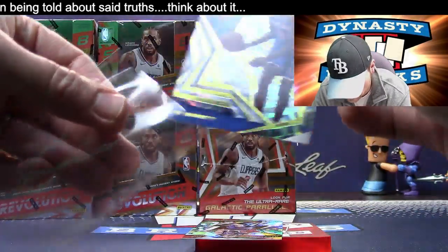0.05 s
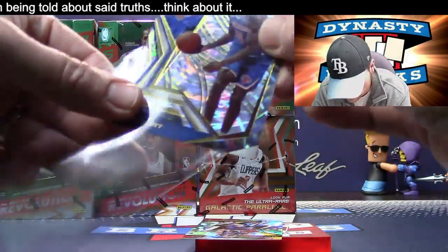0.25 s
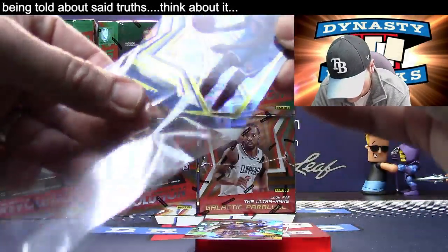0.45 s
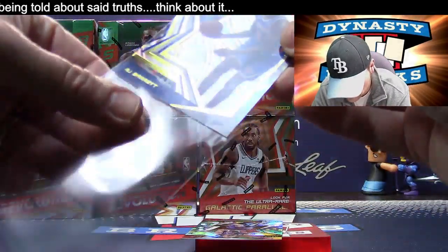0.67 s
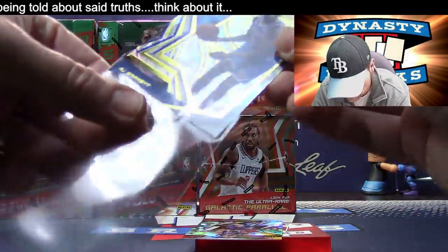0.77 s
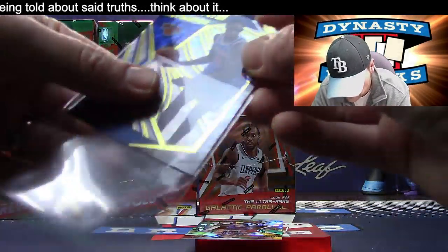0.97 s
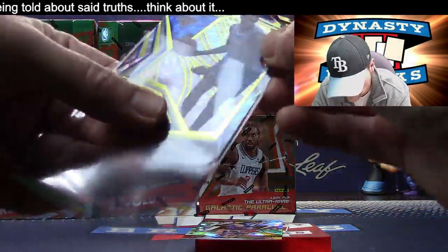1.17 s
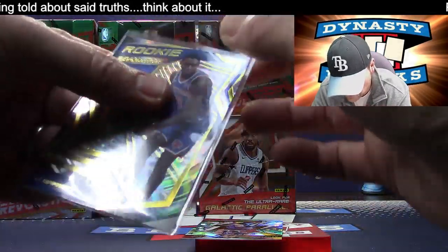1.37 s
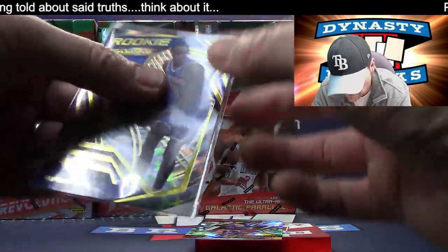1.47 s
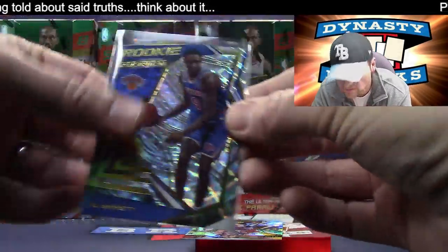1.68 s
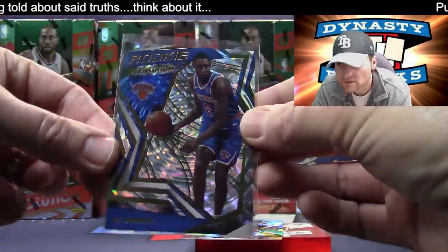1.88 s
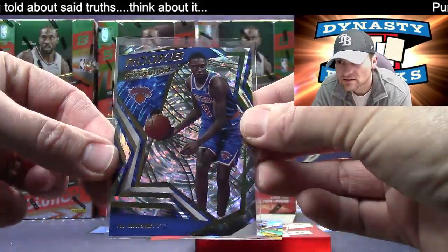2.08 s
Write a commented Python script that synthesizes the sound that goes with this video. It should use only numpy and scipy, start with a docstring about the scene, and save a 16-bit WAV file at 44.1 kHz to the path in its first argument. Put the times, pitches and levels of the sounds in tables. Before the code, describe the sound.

A trading card is pushed into a clear plastic holder, close to the microphone in a small room: a brief bright rub first, a faint tick, then a sharp snap and lighter click over low handling rumble.

```python
"""In a small room, close to the microphone, a trading card is slid into a clear plastic holder.
Plastic rubs briefly (dense random slips), the card's corner ticks against the opening (a noise burst), then
the card snaps home (noise cracks and decaying modes) and settles with a lighter click. A fingertip squeaks
faintly (a wavering tone) and soft touches sound (damped resonances). Low handling rumble, bumps, finger
friction and hiss (coloured noise and pulses) lie beneath; echoes and a diffuse tail give the room."""
import sys
import numpy as np
from scipy import signal
from scipy.fft import rfft, irfft
from scipy.io import wavfile

SR = 44100
rng = np.random.default_rng(int(sys.argv[2]) if len(sys.argv) > 2 else 0)


def store_wav(level_fs):
    """Save 16-bit WAV to argv[1]."""
    pcm = np.round(np.clip(np.atleast_2d(level_fs), -1, 1) * 32767)
    wavfile.write(sys.argv[1], SR, pcm.T.astype(np.int16))


N = 94197
T = np.arange(N) / SR  # time of each sample in seconds

# In every colour table the levels are relative: the coloured signal is scaled to rms 1.

# Catches of the card in the holder. Each row: start in seconds, ring gain in dB, crack level in dB.
CLICKS = [(1.1832, -64, -51), (1.1853, -52, -49), (1.1894, -35, -38.5), (1.1907, -34, -47)]
# Modes of the holder. Each row: frequency in Hz, level in dB before the ring gain, t60 in seconds.
HOLDER_MODES = [(5500, -17, .012), (6500, -16, .012), (7016, -6, .016), (7867, -3, .018), (8500, -15, .012),
                (11800, -21, .01)]
# Spectrum of the cracks. Each row: frequency in Hz, level in dB.
CRACK_COLOUR = [(450, -23), (700, -23.5), (900, -6.5), (1150, -8), (1350, -5), (1700, -17), (2200, -1.5),
                (2550, -14), (2850, -20.5), (3450, -33), (3750, -8.5), (5000, -14.5), (6800, 10),
                (8000, 6.5), (9200, 5.5), (10500, -3.5), (11700, 1.5), (13500, -18.5), (14800, -6.5),
                (15800, -17)]
CRACK_T60_S = .015
# The card gathers speed before it seats. Each row: time in seconds, level in dB.
PUSH_LEVEL = [(1.10, -115), (1.145, -87.5), (1.168, -86), (1.18, -62), (1.186, -42), (1.192, -110)]
# Spectrum of that slide. Each row: frequency in Hz, level in dB.
PUSH_COLOUR = [(600, -21), (1000, -1), (2200, -10), (3200, -24), (4000, -8.5), (5000, -14), (7500, -4),
               (11000, -0.5), (15500, -17)]
# The card's edge flaps back against the wall. Each row: peak time in seconds, level in dB.
FLAPS = [(1.2668, -52), (1.2685, -52)]
# Spectrum of the flaps. Each row: frequency in Hz, level in dB.
FLAP_COLOUR = [(700, -22), (1250, -11), (1570, -19), (1950, -11.5), (2800, -25.5), (3700, 1), (4500, 0.5),
               (5100, -9.5), (5700, -0.5), (6500, -2), (8200, 2.5), (8900, 0), (9500, -20), (11000, -9),
               (11500, 0.5), (12400, -27), (15000, -22)]
# The card's edge rings on. Each row: frequency in Hz, level in dB, t60 in seconds.
FLAP_RING = [(8160, -56, 0.057)]
FLAP_RISE_S, FLAP_T60_S = .0009, .022
HOLLOW_HZ, HOLLOW_WIDTH_HZ = 3060, 610  # the holder radiates poorly here

# Pressure of the opening rub. Each row: time in seconds, level in dB.
RUB_LEVEL = [(0, -57), (.016, -49), (.038, -50), (.055, -48), (.072, -50.5), (.087, -52.5), (.096, -74.5),
             (.13, -120)]
# Spectrum of the rub's slips. Each row: frequency in Hz, level in dB.
RUB_COLOUR = [(410, -67), (700, -52), (1100, -51), (1250, -22.5), (1470, -25.5), (1580, -17.5),
              (1690, -11.5), (2080, -16), (2160, -9), (4080, -5.5), (5150, -6), (6760, 3), (9980, -1.5),
              (13400, -12), (15500, -34)]
# Resonances of the rubbed sheet. Each row: frequency in Hz, width in Hz, initial level in dB.
RUB_RESONANCES = [(1905, 100, -15.5), (3215, 97, -19.5), (4280, 280, -21.5), (7550, 390, -9.5),
                  (10000, 190, -16)]
RUB_RING_LOSS_DB_PER_S = 89.5  # the sheet rings less as the card fills it
RUB_GRAINS_PER_S, RUB_GRAIN_SPREAD_DB = 25000, 2.2
RUB_BRIGHT_HZ, RUB_BRIGHT_DB, RUB_DULLING_DB_PER_S = 5490, -3, 60  # the treble fades as the rub slows
RUB_PATCHY_DB, RUB_PATCH_HZ = 2.5, 35
# The sheet drags harder once. Each row of its spectrum: frequency in Hz, level in dB.
RUB_DRAG_COLOUR = [(1100, -39.5), (1700, -9), (2600, -3), (3900, -2), (5500, -3), (8000, -17.5),
                   (10300, -6.5), (14000, -25.5)]
RUB_DRAG_S, RUB_DRAG_DB, RUB_DRAG_RISE_S, RUB_DRAG_T60_S = .054, -53.5, .0031, .11

# Scuff of the card's corner on the opening. Each row: frequency in Hz, level in dB.
TICK_COLOUR = [(900, -36), (1900, -25), (2280, 7.5), (2900, -17.5), (3850, -11), (4700, -18), (6000, -25),
               (6950, -5.5), (8000, -31.5), (12700, -15), (15000, -28)]
TICK_S, TICK_DB, TICK_RISE_S, TICK_T60_S = .3665, -68, .0031, .024

# Light touches on the plastic. Each row: peak time in seconds, level in dB, frequency in Hz, width in Hz,
# rise in seconds, t60 in seconds.
TOUCHES = [(.05, -86.5, 386, 59.5, 0.022, 0.16), (.15, -84, 400, 73.7, 0.013, 0.29),
           (.15, -96, 530, 90, 0.011, .1), (0.334, -87, 550, 78.4, .008, 0.047),
           (0.383, -84.5, 455, 47.5, .012, 0.11), (0.417, -82, 291, 71, 0.01, 0.075),
           (.538, -90, 507, 90.4, 0.007, .06), (.65, -82.5, 346, 41, 0.013, .12),
           (0.74, -90.5, 642, 102.5, 0.0046, 0.08), (.802, -92.5, 712, 61.6, 0.018, 0.11),
           (0.977, -79.5, 953, 170, 0.0083, 0.045), (1.021, -83, 342, 69, 0.0069, 0.094),
           (1.395, -83.5, 478, 79, 0.0087, 0.087), (1.468, -84.5, 757, 90.4, 0.0054, 0.12),
           (1.586, -84.5, 780, 71.4, .01, 0.11), (1.732, -67.5, 1400, 294.8, 0.0019, 0.076),
           (1.736, -93, 3260, 120, 0.0035, 0.036), (1.736, -73.5, 556.3, 98, 0.0087, .17),
           (1.946, -77.5, 560, 79.6, 0.0029, 0.075), (2.015, -81, 590, 79.2, 0.01, 0.094),
           (2.068, -86.5, 634, 79, .008, 0.082)]

# Fingertip sticking and slipping. Each row: time in seconds, pitch in Hz, level in dB.
SQUEAK = [(1.652, 1239, -100), (1.672, 1257, -67.5), (1.688, 1289, -69), (1.70, 1300, -95),
          (1.715, 1324, -75.5), (1.745, 1390, -77), (1.78, 1488, -85.5), (1.805, 1580, -100)]
SQUEAK_JITTER, SQUEAK_FLUTTER_DB = .014, -.5  # scale of the random wander: fraction of pitch, level

# Soft bumps of the hands. Each row: centre in seconds, peak level in dB, length in seconds.
BUMPS = [(.141, -46, 0.014), (0.259, -41, .0066), (0.412, -45.5, 0.009), (0.451, -50.5, 0.0071),
         (0.538, -50.5, 0.0069), (0.596, -44, 0.018), (0.689, -52, 0.013), (.735, -52, 0.007),
         (0.8, -42.5, 0.012), (.858, -56, 0.0061), (0.926, -48.5, 0.0099), (1.019, -54, 0.0066),
         (1.057, -52.5, 0.013), (1.419, -37.5, 0.0072), (1.765, -37.5, .0061), (1.937, -40.5, 0.0051),
         (2.089, -34.5, 0.0073)]

# Level of the handling rumble. Each row: time in seconds, level in dB.
RUMBLE_LEVEL = [(0, -42), (.06, -42), (.11, -46), (.26, -46.5), (.35, -50), (.43, -52), (.6, -55.5),
                (.68, -62), (.8, -46.5), (.89, -60.5), (1.0, -60.5), (1.09, -60.5), (1.2, -39.5),
                (1.35, -46.5), (1.5, -37), (1.65, -43), (1.85, -42.5), (2.11, -42)]
# Spectrum of the rumble. Each row: frequency in Hz, level in dB.
RUMBLE_COLOUR = [(12, 13), (17, 12), (27, -1), (45, -7.5), (68, -6), (95, -17.5), (120, -13.5), (160, -26),
                 (220, -36), (300, -46)]
# Level of the soft finger friction. Each row: time in seconds, level in dB.
FINGER_LEVEL = [(.02, -96.5), (.16, -92), (.32, -98.5), (.4, -88), (.5, -95.5), (.66, -96.5), (.9, -95.5),
                (1.03, -93), (1.12, -95.5), (1.3, -92.5), (1.48, -85), (1.65, -86.5), (1.85, -86.5),
                (2.1, -90.5)]
# Spectrum of the finger friction. Each row: frequency in Hz, level in dB.
FINGER_COLOUR = [(120, -8), (280, 2.5), (500, -5.5), (800, -14.5), (1400, -19.5), (3000, -33),
                 (8000, -40.5)]
FINGER_LUMPS_DB, FINGER_LUMPS_HZ = 2.5, 14
# Spectrum of the hiss. Each row: frequency in Hz, level in dB.
HISS_COLOUR = [(200, 12.5), (1000, -14), (3000, -1.5), (8000, -1.5), (15000, 1)]
HISS_DB = -98
RUMBLE_SIDE_DB, FINGER_SIDE_DB, HISS_SIDE_DB = -25, -15, -1.5  # side relative to centre

# Early reflections from nearby surfaces. Each row: delay in seconds, level in dB.
ECHOES = [(.0046, -20), (.0092, -16)]
# Spectrum of the diffuse tail. Each row: frequency in Hz, level in dB.
ROOM_COLOUR = [(300, -3), (1200, 3.5), (2200, 3), (4000, 4), (8000, .5), (12000, -.5), (16000, 3)]
# Further colouring of the tail's side signal. Each row: frequency in Hz, level in dB.
ROOM_SIDE_COLOUR = [(300, -7.5), (1000, -11.5), (2500, -10), (6000, -10), (10000, -19.5), (13000, -6)]
ROOM_DB, ROOM_SIDE_DB, ROOM_DELAY_S, ROOM_BUILD_S = -8.5, -7.5, .005, .0013
ROOM_T60_S, TREBLE_T60_S, WALL_DAMPING_HZ = .33, .225, 1638  # the treble decays faster above this split
CUTOFF_HZ = 15800


def card_seating():
    """Impact excitation: a slide ends in catches that crack and ring the holder; then the edge flaps back."""
    slide = from_db(in_time(PUSH_LEVEL)[0]) * friction(PUSH_COLOUR)
    rings = sum(from_db(ring_db) * ring(s, HOLDER_MODES) for s, ring_db, _ in CLICKS)
    crack_level = sum(from_db(crack_db) * decay(s, CRACK_T60_S) for s, _, crack_db in CLICKS)
    cracks = crack_level * noise(CRACK_COLOUR)
    flap_level = sum(from_db(db) * swell(s, FLAP_RISE_S, FLAP_T60_S) for s, db in FLAPS)
    flaps = flap_level * noise(FLAP_COLOUR) + ring(FLAPS[-1][0], FLAP_RING)
    hollow = signal.iirnotch(HOLLOW_HZ, HOLLOW_HZ / HOLLOW_WIDTH_HZ, fs=SR)
    return signal.lfilter(*hollow, slide + rings + cracks + flaps)


def rub():
    """Friction excitation: slips drive the sheet's resonances in turn, and the swish dulls as it slows."""
    slips = patchy(friction(RUB_COLOUR), RUB_PATCHY_DB, RUB_PATCH_HZ)
    for hz, width_hz, db in RUB_RESONANCES:
        resonance = rms_one(signal.lfilter(*signal.iirpeak(hz, hz / width_hz, fs=SR), slips))
        slips = slips + from_db(db - RUB_RING_LOSS_DB_PER_S * T) * resonance
    low = lowpass(slips, RUB_BRIGHT_HZ)
    treble = (slips - low) * from_db(RUB_BRIGHT_DB - RUB_DULLING_DB_PER_S * T)
    swish = from_db(in_time(RUB_LEVEL)[0]) * (low + treble)
    drag_level = from_db(RUB_DRAG_DB) * swell(RUB_DRAG_S, RUB_DRAG_RISE_S, RUB_DRAG_T60_S)
    return swish + drag_level * friction(RUB_DRAG_COLOUR)


def corner_tick():
    """Transient scuffing: a short burst of coloured noise under a soft attack and exponential release."""
    return from_db(TICK_DB) * swell(TICK_S, TICK_RISE_S, TICK_T60_S) * noise(TICK_COLOUR)


def touches():
    """Damped resonance: each soft contact is one decaying tone, broadened by random wander of its frequency."""
    out = np.zeros(N)
    for s, db, hz, width_hz, rise, t60 in TOUCHES:
        wandering_hz = hz + width_hz / 2 * drift(width_hz)
        out += from_db(db) * swell(s, rise, t60) * tone(wandering_hz)
    return out


def squeak():
    """Stick-slip oscillation: a fingertip's thin, rising tone, unsteady in pitch and level."""
    hz, db = in_time(SQUEAK)
    sounding = (T > SQUEAK[0][0]) & (T < SQUEAK[-1][0])
    wavering = tone(hz * (1 + SQUEAK_JITTER * drift(87)))
    return sounding * from_db(db + SQUEAK_FLUTTER_DB * drift(70)) * wavering


def bumps():
    """Pressure pulses: each bump is a low push flanked by two weaker swings of opposite sign."""
    out = np.zeros(N)
    for s, db, length in BUMPS:
        squared = ((T - s) / length) ** 2
        out += from_db(db) * (1 - 2 * squared) * np.exp(-squared)
    return out


def room(x):
    """Diffuse reverberation: convolution with decaying noise whose treble has its own, shorter decay."""
    mid = noise(ROOM_COLOUR)
    side = from_db(ROOM_SIDE_DB) * coloured(noise(ROOM_COLOUR), ROOM_SIDE_COLOUR)
    diffuse = (mid + side * np.array([[1], [-1]])) * (1 - np.exp(-T / ROOM_BUILD_S))
    low = lowpass(diffuse, WALL_DAMPING_HZ)
    response = low * decay(ROOM_DELAY_S, ROOM_T60_S) + (diffuse - low) * decay(ROOM_DELAY_S, TREBLE_T60_S)
    response = response / np.sqrt(np.sum(response ** 2) / 2)  # mean channel energy 1
    return from_db(ROOM_DB) * signal.fftconvolve(x[None], response, axes=1)[:, :N]


def background():
    """Random noise: handling rumble, lumpy soft finger friction and faint hiss, each with its own spectrum."""
    rumble_colour = RUMBLE_COLOUR + [(700, -88.5)]  # falls away steeply at the top
    rumble = from_db(in_time(RUMBLE_LEVEL)[0]) * stereo_noise(rumble_colour, RUMBLE_SIDE_DB)
    finger_db = in_time(FINGER_LEVEL)[0] + FINGER_LUMPS_DB * drift(FINGER_LUMPS_HZ)
    fingers = from_db(finger_db) * stereo_noise(FINGER_COLOUR, FINGER_SIDE_DB)
    return rumble + fingers + from_db(HISS_DB) * stereo_noise(HISS_COLOUR, HISS_SIDE_DB)


def friction(colour):
    """Granular friction: dense tiny slips of uneven size and random sign, coloured by the plastic."""
    sizes = from_db(RUB_GRAIN_SPREAD_DB * np.minimum(rng.exponential(1, N), 5))
    signs = rng.choice([-1, 1], N)
    slipping = rng.random(N) < RUB_GRAINS_PER_S / SR
    return coloured(sizes * signs * slipping, colour)


def patchy(x, depth_db, rate_hz, count=14):
    """Band modulation: each overlapping band swells and fades on its own as the plastic flexes."""
    hz = np.arange(N // 2 + 1) * SR / N
    place = np.interp(np.log(hz + 1), np.log([1000, 16000]), [0, count - 1])
    spectrum = rfft(x)
    out = np.zeros(N)
    for k in range(count):
        band = irfft(spectrum * np.maximum(1 - abs(place - k), 0), N)
        out += band * from_db(depth_db * drift(rate_hz))
    return rms_one(out)


def ring(s, modes):
    """Modal superposition: decaying sines set ringing by one contact."""
    return sum(from_db(db) * decay(s, t60) * np.sin(2 * np.pi * hz * (T - s)) for hz, db, t60 in modes)


def tone(hz):
    """Phase accumulation: a sine of rms 1 follows a changing frequency."""
    return np.sqrt(2) * np.sin(2 * np.pi * np.cumsum(hz) / SR)


def decay(s, t60):
    """Exponential damping: instant attack at s, then 60 dB lost in t60 seconds."""
    return (T >= s) * from_db(-60 * np.maximum(T - s, 0) / t60)


def swell(s, rise, t60):
    """Gradual excitation: a Gaussian attack up to s, then exponential damping."""
    return np.where(T < s, np.exp(-((T - s) / rise) ** 2), decay(s, t60))


def coloured(x, points):
    """Spectral shaping: gain set over log frequency, with a further low cut below the first point; rms 1."""
    hz, db = np.transpose(points)
    f = np.maximum(np.arange(N // 2 + 1) * SR / N, 1)
    gain = from_db(np.interp(np.log(f), np.log(hz), db)) * np.minimum(f / hz[0], 1) ** 2
    return rms_one(irfft(rfft(x) * gain, N))


def noise(points):
    """Filtered randomness: Gaussian noise with a given spectrum."""
    return coloured(rng.standard_normal(N), points)


def stereo_noise(points, side_db):
    """Mid-side stereo: common noise plus independent noise of opposite sign in the two channels."""
    return noise(points) + from_db(side_db) * noise(points) * np.array([[1], [-1]])


def drift(rate_hz):
    """Low-passed randomness: wander of rms 1 up to about rate_hz."""
    lowpass_sos = signal.butter(2, rate_hz, fs=SR, output="sos")
    return rms_one(signal.sosfilt(lowpass_sos, rng.standard_normal(N)))


def lowpass(x, hz):
    """Zero-phase filtering: keep the part below hz without delay."""
    return signal.sosfiltfilt(signal.butter(2, hz, fs=SR, output="sos"), x)


def in_time(rows):
    """Linear interpolation: each column of a curve, sample by sample."""
    s, *columns = np.transpose(rows)
    return [np.interp(T, s, c) for c in columns]


def rms_one(x):
    """Power normalisation: scale to unit rms."""
    return x / np.sqrt(np.mean(x ** 2) + 1e-20)


def from_db(db):
    """Logarithmic level: decibels to amplitude gain."""
    return 10 ** (np.asarray(db) / 20)


def scene():
    """Superposition: central plastic sounds, their early reflections and room, bumps and background."""
    plastic = rub() + card_seating() + corner_tick() + touches() + squeak()
    echoes = sum(from_db(db) * np.interp(T - delay, T, plastic, left=0) for delay, db in ECHOES)
    return plastic + echoes + room(plastic) + bumps() + background()


def record(dry):
    """Band limitation: a steep elliptic low-pass cuts the top."""
    return signal.sosfilt(signal.ellip(10, .1, 80, CUTOFF_HZ, fs=SR, output="sos"), dry)


dry = scene()
out = record(dry)
store_wav(out)
```